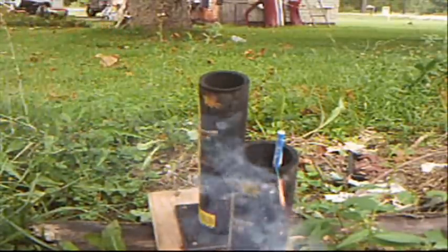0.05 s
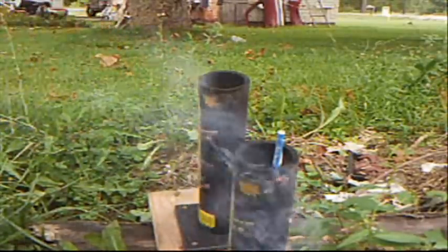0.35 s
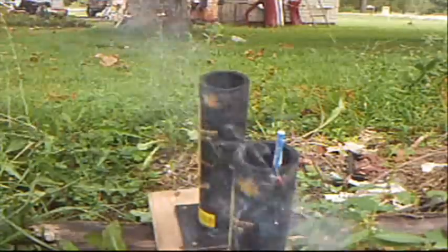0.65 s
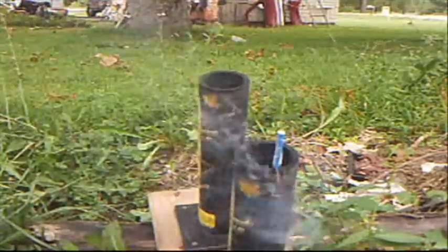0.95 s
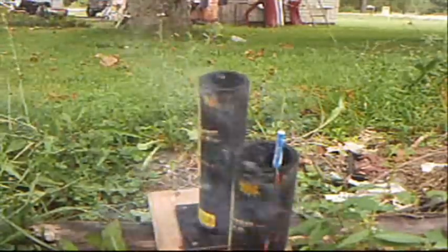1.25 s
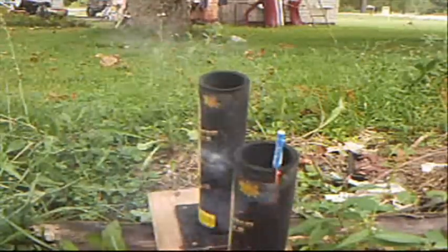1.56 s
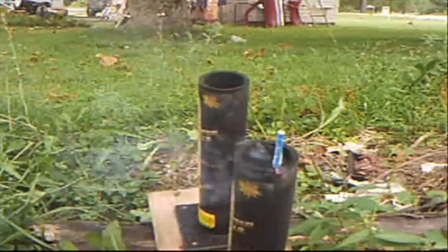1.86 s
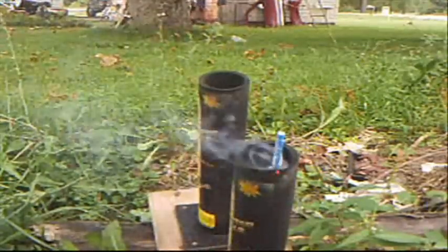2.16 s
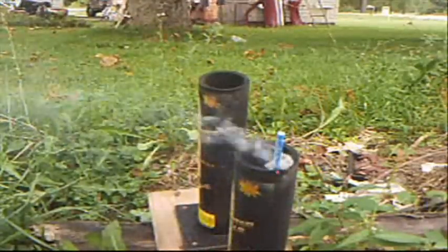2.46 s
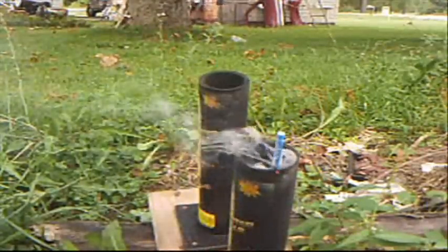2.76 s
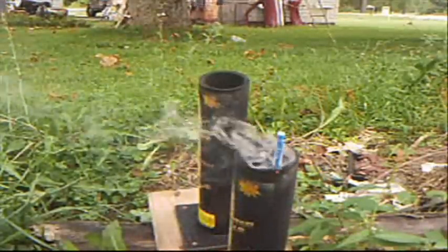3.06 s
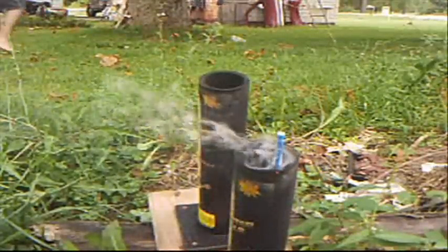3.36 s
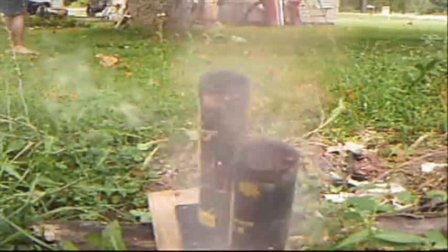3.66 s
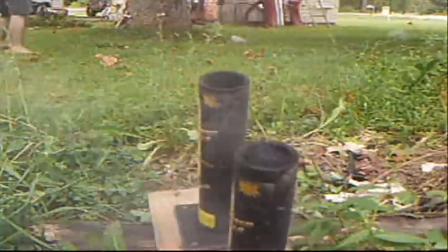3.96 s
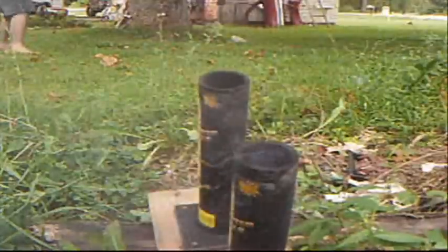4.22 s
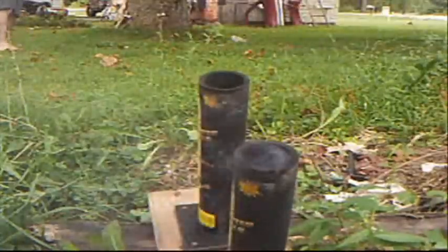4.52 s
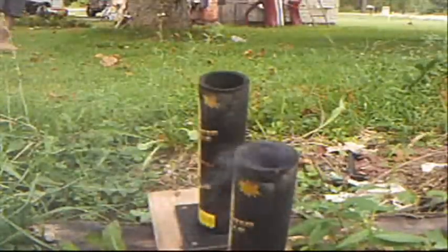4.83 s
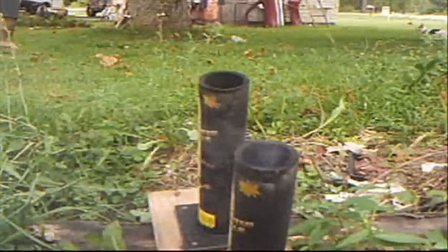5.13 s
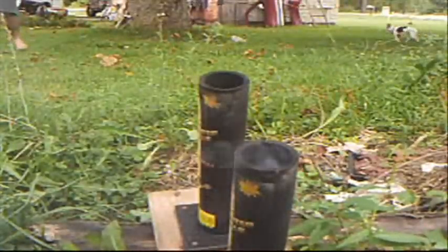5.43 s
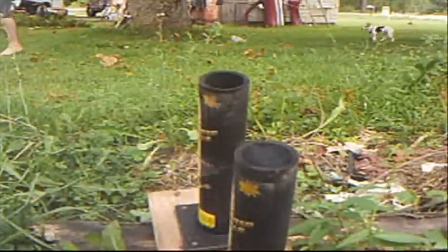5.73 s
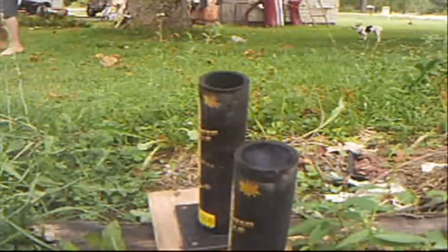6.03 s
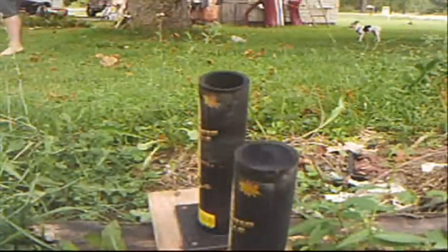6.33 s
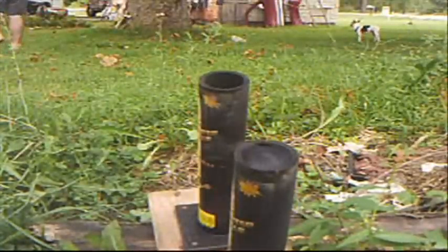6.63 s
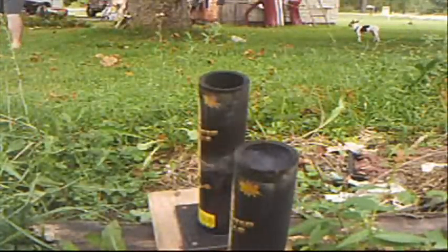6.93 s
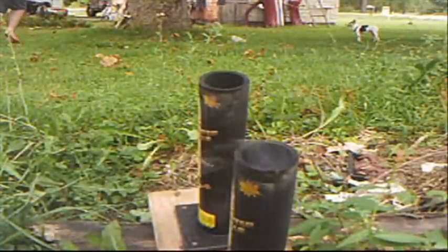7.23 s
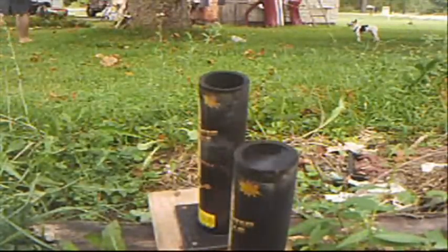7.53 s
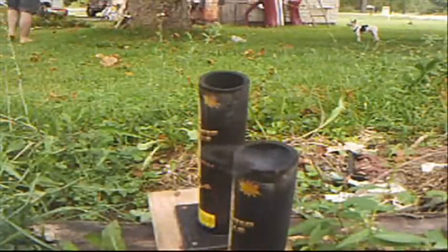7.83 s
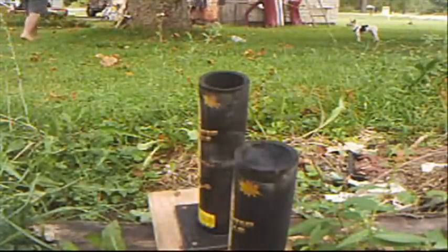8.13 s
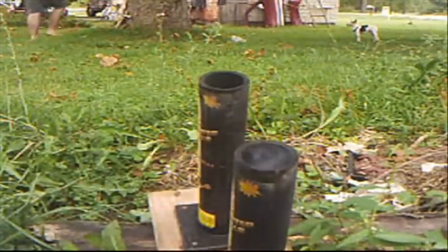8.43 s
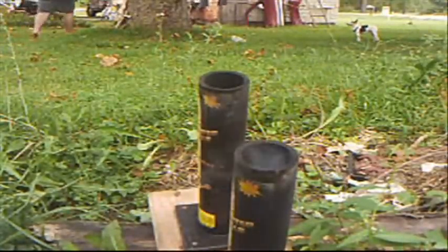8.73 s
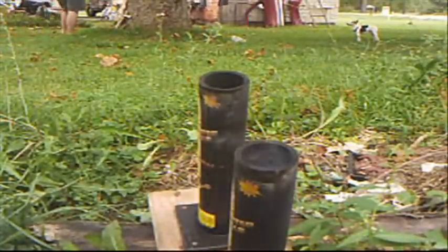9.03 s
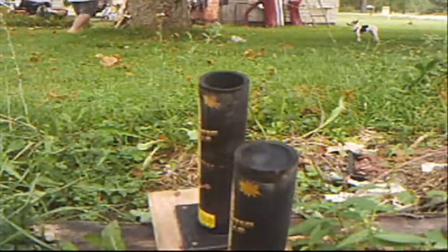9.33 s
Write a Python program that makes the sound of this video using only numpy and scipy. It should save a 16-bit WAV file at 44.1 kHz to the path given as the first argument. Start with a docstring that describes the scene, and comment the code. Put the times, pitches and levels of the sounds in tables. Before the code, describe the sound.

Crickets and insects chirp outdoors as a firework launches from a tube with a loud blast, then bursts with one sharp, echoing crack.

```python
"""A firework mortar fires from a lawn: the fuse fizzes and spits, the lift charge roars out as a jet
of gas, and the emptied tube hoots in its own draught. The shell bursts overhead with one sharp crack,
which the yard and a far line of trees throw back. Both bangs overload the microphone.
Around it two crickets chirp with their wings in front of farther ones, over a steady hiss of higher
insects, a low outdoor murmur and faint road-like drones."""
import sys
import numpy as np
from scipy import signal
from scipy.fft import rfft, irfft, next_fast_len
from scipy.io import wavfile

SR = 44100
rng = np.random.default_rng(int(sys.argv[2]) if len(sys.argv) > 2 else 0)


def wav_record(signal):
    """Record a signal, one row per channel, as 16-bit PCM in the file named by sys.argv[1]."""
    frames = np.transpose(np.atleast_2d(signal))
    bounded = np.clip(frames, -1, 1)
    # unit amplitude maps onto the largest positive 16-bit level
    quanta = np.round(bounded * 32767).astype(np.int16)
    wavfile.write(sys.argv[1], SR, quanta)


N = 413658
TIME = np.arange(N) / SR
FIRE_S, SHELL_OUT_S = 3.678, 3.727  # the lift charge lights, the shell leaves the muzzle


def from_db(db):
    """Decibels to gain."""
    return 10 ** (np.asarray(db) / 20)


def rms_one(x):
    """Scale to unit power."""
    return x / np.sqrt(np.mean(x ** 2) + 1e-20)


def noise(colour):
    """Unit-power noise shaped by an EQ curve."""
    hz, db = np.transpose(colour)
    bins = np.maximum(np.arange(N // 2 + 1) * SR / N, 1)
    eq = from_db(np.interp(np.log(bins), np.log(hz), db))
    return rms_one(irfft(rfft(rng.standard_normal(N)) * eq, N))


def flutter(rate_hz, depth_db):
    """A gain that wanders at random."""
    knots = rng.standard_normal(N // 10)
    return from_db(depth_db * np.interp(TIME * rate_hz, np.arange(len(knots)), knots))


def resonate(x, hz, width_hz):
    """One resonance, unity gain at its peak."""
    r = np.exp(-np.pi * width_hz / SR)
    poles = [1, -2 * r * np.cos(2 * np.pi * hz / SR), r * r]
    return signal.lfilter(np.array([1, 0, -1]) * (1 - r * r) / 2, poles, x + 1e-18)


def bandpass(x, hz, width_hz):
    """The same resonance twice, for steeper skirts."""
    return resonate(resonate(x, hz, width_hz), hz, width_hz)


def waver(hz, width_hz, evenness=0.25):
    """Turbulence sounding one resonance, its swings partly evened by saturation; unit power."""
    tone = signal.hilbert(resonate(rng.standard_normal(N), hz, width_hz), next_fast_len(N))[:N]
    return rms_one(tone.real / (np.abs(tone) + 1e-6) ** evenness)


def swell(full_s, hold_s, db, attack_db_per_s, release_db_per_s):
    """A gain envelope: attack, hold, release."""
    early, late = np.maximum(full_s - TIME, 0), np.maximum(TIME - full_s - hold_s, 0)
    return from_db(np.maximum(db - attack_db_per_s * early - release_db_per_s * late, -200))


def swells(rows):
    """The envelope of several swells whose powers add."""
    return np.sqrt(sum(swell(*row) ** 2 for row in rows))


def ring(start_s, hz, t60_s, db):
    """A struck resonance: one decaying sine."""
    age = np.maximum(TIME - start_s, 0)
    return from_db(db - 60 * age / t60_s) * np.sin(2 * np.pi * hz * age)


def scatter(x, colour, t60_s, wet_db):
    """Grass, trunks and walls scatter a sound into a short dense tail."""
    onset = 1 - np.exp(-TIME / 0.0028)
    tail = (noise(colour) * from_db(-60 * TIME / t60_s) * onset)[:SR]
    return from_db(wet_db) * signal.fftconvolve(x, tail / np.linalg.norm(tail))[:N]


# dark EQ of the ambience bed: freq_hz, gain_db
MURMUR_EQ = [(15, -3), (50, 0.5), (90, -2.5), (150, -11), (300, -6.5), (550, -5.5), (850, -1), (1150, -5.5),
             (1450, -11), (2000, -12), (3000, -19.5), (6000, -25), (11000, -30.5), (16000, -32)]
def murmur(db, ebb_db_per_s):
    """A distant outdoor murmur, slowly ebbing."""
    return from_db(db - ebb_db_per_s * TIME) * noise(MURMUR_EQ)


# far road-like hum: pitch_hz, width_hz, level_db
DRONE_TONES = [(412, 16, -63), (582.6, 12, -58.5), (783, 28, -62)]
def drones():
    """Faint tones that wander in level."""
    return sum(from_db(db) * waver(hz, width) * flutter(rate_hz=3.01, depth_db=1.6)
               for hz, width, db in DRONE_TONES)


# tones that poke out of the drones: full_s, hold_s, level_db, pitch_hz, sink_hz_per_s
PASSING_WHINES = [(1.55, .75, -53, 602, 14), (2.85, 0.11, -54, 421, 10), (8.98, 0.091, -52, 780, 20)]
def whines(fade_db_per_s):
    """Each whine fades in and out, sinking in pitch as it passes."""
    out = np.zeros(N)
    for full_s, hold_s, db, hz, sink_hz_per_s in PASSING_WHINES:
        wobble_hz = 10 * np.log(flutter(rate_hz=40, depth_db=5))
        pitch = hz - sink_hz_per_s * (TIME - full_s) + wobble_hz
        tone = rms_one(np.sin(2 * np.pi * np.cumsum(pitch) / SR) * flutter(rate_hz=25, depth_db=2.5))
        out += swell(full_s, hold_s, db, fade_db_per_s, fade_db_per_s) * tone
    return out


# high insect sizzle: centre_hz, width_hz, relative_db
INSECT_BANDS = [(7636, 1280, 2.5), (14330, 1270, -1.5)]
def insect_chorus(level_db):
    """Countless far insects merge into two bands of hiss."""
    hiss = sum(from_db(db) * bandpass(rng.standard_normal(N), hz, width)
               for hz, width, db in INSECT_BANDS)
    return from_db(level_db) * rms_one(hiss) * flutter(rate_hz=60, depth_db=1.35)


def far_crickets(level_db):
    """The farthest crickets blur into one wavering band."""
    band = rms_one(bandpass(rng.standard_normal(N), hz=4705, width_hz=390))
    return from_db(level_db) * band * flutter(rate_hz=25, depth_db=3.5)


# mid-heavy EQ of the yard's reverb: freq_hz, gain_db
YARD_EQ = [(50, -22), (220, -14), (420, -2.5), (600, 4), (1000, 6), (2000, 1), (3500, -4), (6000, -10.5),
           (8000, -6), (11000, -23), (14000, -10), (16000, -15)]
def yard_reverb(x, t60_s, wet_db):
    """The tail that the yard scatters back."""
    return scatter(x, YARD_EQ, t60_s, wet_db)


def cricket(runs, start_hz, end_hz, strokes):
    """Each wing stroke is a whistle that sinks as the scraper slows; a chirp of them swells and fades."""
    stroke_s, strokes_per_s, jitter_s = 0.027, 22, 0.0025
    edge_db, sag_hz = -3, 55  # a chirp is softer at both ends and droops in pitch
    out = np.zeros(N + SR)
    along = np.linspace(0, 1, int(stroke_s * SR))
    glide = start_hz + (end_hz - start_hz) * along ** 1.69  # holds, then drops ever faster
    envelope = np.sqrt(np.abs(np.sin(np.pi * along)))
    for first_s, end_s, period_s, db in runs:
        for middle_s in np.arange(first_s, end_s, period_s):
            for place in np.linspace(-1, 1, strokes):
                late, sharp, accent_db = rng.standard_normal(3)
                hz = glide * (1 + 0.0044 * sharp) - sag_hz * (place + 1) / 2
                stroke = envelope * np.sin(2 * np.pi * np.cumsum(hz) / SR)
                offset_s = place * (strokes - 1) / 2 / strokes_per_s + jitter_s * late
                at = max(int((middle_s + offset_s - stroke_s / 2) * SR), 0)
                out[at:at + len(along)] += from_db(db + edge_db * place ** 2 + accent_db) * stroke
    return out[:N]


# each singer's runs of even chirps: first_chirp_middle_s, end_s, period_s, premix_level_db
LOW_CHIRP_RUNS = [(.14, .7, 0.48, -50.5), (.93, 2.1, 0.49, -49.5), (2.55, 5.5, 0.38, -51),
                  (6.07, 7.1, .41, -51.5), (7.5, 9.4, .452, -51)]
HIGH_CHIRP_RUNS = [(.29, 3.7, .462, -51), (4.56, 5.2, .46, -49.5), (6.59, 7.3, .51, -49),
                   (7.5, 9.4, .447, -51.5)]
def near_crickets(direct_db):
    """Two raspy singers drift in and out of step."""
    rasp = flutter(rate_hz=270, depth_db=3.5)
    low = cricket(LOW_CHIRP_RUNS, start_hz=4780, end_hz=4206, strokes=5) * rasp
    high = cricket(HIGH_CHIRP_RUNS, start_hz=5080, end_hz=4730, strokes=4) * rasp
    send = from_db(-5.5) * low + high  # the high singer is farther off, so wetter
    return from_db(direct_db) * (low + high) + yard_reverb(send, t60_s=0.37, wet_db=-0.5)


# EQ of the fizz: freq_hz, gain_db
FIZZ_EQ = [(100, -1.5), (400, -10), (720, -7), (880, 4), (1200, -3.5), (1650, -9.5), (2030, -2),
           (2300, -22.5), (3200, -14.5), (8000, -28), (16000, -36)]
# snapping sparks: start_s, peak_db, pitch_hz
SPARKS = [(0.229, -33.5, 3400), (0.239, -37, 3400), (.2643, -33, 4200), (0.273, -33, 4000),
          (0.672, -37, 3000), (2.534, -33, 844), (3.045, -43, 6000)]
def fuse(fizz_db, enters_tube_s, fade_db_per_s, spark_decay_s, spark_q):
    """The fuse sputters and spits, its fizz growing fainter as it burns down inside the tube."""
    burning = from_db(fizz_db - fade_db_per_s * np.maximum(TIME - enters_tube_s, 0)) * (TIME < FIRE_S)
    out = burning * noise(FIZZ_EQ) * flutter(rate_hz=120, depth_db=2.5)
    age = TIME[:SR // 20]
    for start_s, db, hz in SPARKS:
        puff = rng.standard_normal(len(age)) * np.exp(-age / spark_decay_s)
        snap = bandpass(puff, hz, hz / spark_q)
        at = int(start_s * SR)
        out[at:at + len(age)] += from_db(db) * snap / np.abs(snap).max()
    return out


# near-odd harmonics of a pipe closed at one end: pitch_hz, width_hz, relative_db
TUBE_MODES = [(274.5, 8, -13), (798, 19.5, -4.5), (1324, 27, -14), (1896, 50, -9), (2437, 56, -19),
              (2990, 110, -20)]
# gusts through the empty tube: full_s, hold_s, level_db, attack_db_per_s, release_db_per_s
TUBE_GUSTS = [(3.7, .004, -25, 1397, 230), (3.78, .03, -42.5, 600, 60), (4.02, 0.22, -42, 109, 70),
              (4.3, 0.023, -37.5, 300, 398), (4.4, 0.17, -44.5, 150, 85)]
def tube_hoot():
    """The departing shell kicks the hot air column; gas surging in the empty tube then blows its modes."""
    kick = ring(start_s=3.72, hz=279, t60_s=0.29, db=-24.5)
    draught = swells(TUBE_GUSTS) * flutter(rate_hz=45, depth_db=2)
    hoot = rms_one(sum(from_db(db) * waver(hz, width) for hz, width, db in TUBE_MODES))
    return kick + draught * hoot


# full-bodied EQ of the gas jet: freq_hz, gain_db
JET_EQ = [(20, -6), (55, 3.5), (110, 0.5), (170, -5.5), (260, 1.5), (360, -5), (520, 1), (680, -2.5),
          (850, 1), (1300, -4.5), (2000, -4.5), (3000, -6), (5000, -8.5), (8000, -9.5), (16000, -17)]
# bright EQ of the tail off the leaves: freq_hz, gain_db
FOLIAGE_EQ = [(100, -35), (700, -8.5), (2000, -6), (4000, -3.5), (8000, -1.5), (11000, -6), (14000, 3),
              (16000, -3.5)]
def lift_charge(overshoot_db, build_s, settle_s):
    """A ragged jet of gas overshoots, holds until the shell is out, then collapses; foliage scatters it."""
    pressure = swell(FIRE_S, SHELL_OUT_S - FIRE_S, db=-8, attack_db_per_s=1343, release_db_per_s=830)
    early, age = np.maximum(FIRE_S - TIME, 0), np.maximum(TIME - FIRE_S, 0)
    overshoot = from_db(overshoot_db * np.exp(-(age / settle_s) ** 2 - early / build_s))
    jet = pressure * overshoot * noise(JET_EQ) * flutter(rate_hz=600, depth_db=2.2)
    return jet + scatter(jet, FOLIAGE_EQ, t60_s=0.32, wet_db=-12.5)


# rolling echoes: full_s, hold_s, level_db, attack_db_per_s, release_db_per_s
TREE_RETURNS = [(5.42, .02, -41, 1050, 33), (5.725, 0.13, -40.5, 260, 130), (5.94, .08, -43, 110, 55),
                (6.1, .1, -54.5, 63, 10)]
# thin, dull EQ of those echoes: freq_hz, gain_db
TREE_EQ = [(100, -44), (500, -19), (1000, -4), (1400, -3), (2200, -4.5), (3200, -13), (5000, -17),
           (7000, -28), (12000, -63)]
def tree_echoes():
    """Trees at several distances return the burst as swells of noise."""
    return swells(TREE_RETURNS) * noise(TREE_EQ) * flutter(rate_hz=100, depth_db=2)


# slapbacks off nearby walls and trunks: start_s, send_db
SLAPBACKS = [(5.3837, 9.5), (5.418, -1.5), (5.4254, -1), (5.487, -9.5)]
# EQ of the slapbacks: freq_hz, gain_db
SLAP_EQ = [(100, -24), (280, -13), (550, 4), (1100, -1), (2200, 2), (4000, -16), (8000, -16), (16000, -36)]
def yard_echoes(hit_s):
    """The ground shock sets nearby things ringing; the yard answers with slaps and a short tail."""
    ringing = ring(hit_s, hz=994, t60_s=0.033, db=-4.5)
    hit, taps = np.zeros((2, N))
    hit[int(hit_s * SR)] = 1
    for start_s, db in SLAPBACKS:
        taps[int(start_s * SR)] = from_db(db)
    slaps = scatter(taps, SLAP_EQ, t60_s=0.028, wet_db=2)
    return ringing + slaps + yard_reverb(hit, t60_s=0.41, wet_db=11.5)


# the crack, direct then off the ground: start_s, n_wave_peak_db, length_s, tear_relative_db
SHOCK_WAVES = [(5.3803, 7.5, 0.001207, 1), (5.3836, 12, 0.0004, -0.5)]
# EQ of its tearing edge: freq_hz, gain_db
TEAR_EQ = [(50, 0), (400, 1.5), (1000, 4.5), (2300, 7), (3500, -9), (5000, -1.5), (8000, -3), (11000, -17),
           (14000, -4.5), (16000, -9)]
def shell_burst(tear_s, push_s, push_relative_db):
    """Two N-shaped shocks, each with a tearing edge and a low push, then their echoes."""
    crack, tearing = np.zeros(N), noise(TEAR_EQ)
    for start_s, db, length_s, tear_db in SHOCK_WAVES:
        age = np.maximum(TIME - start_s, 0)
        n_wave = (1 - 2 * age / length_s) * (age < length_s)
        edge = from_db(tear_db) * tearing * np.exp(-(age / tear_s) ** 2)
        push = from_db(push_relative_db) * (1 - age / push_s) * np.exp(-age / push_s)
        crack += from_db(db) * (age > 0) * (n_wave + edge + push)
    return crack + yard_echoes(hit_s=SHOCK_WAVES[-1][0]) + tree_echoes()


def scene():
    """The mono mix at one microphone near the tube."""
    bed = murmur(db=-46.5, ebb_db_per_s=0.1853) + drones() + whines(fade_db_per_s=55)
    insects = insect_chorus(level_db=-54.5) + far_crickets(level_db=-62.5) + near_crickets(direct_db=-2.5)
    fizz = fuse(fizz_db=-48.5, enters_tube_s=1.35, fade_db_per_s=5.5, spark_decay_s=0.0035, spark_q=0.98)
    launch = tube_hoot() + lift_charge(overshoot_db=11, build_s=0.0038, settle_s=0.013)
    burst = shell_burst(tear_s=0.00099, push_s=0.0026, push_relative_db=-19)
    return (bed + insects + fizz + launch + burst)[None]


def record(dry):
    """The converter sits off centre and clips on the bangs; a steep low-pass cuts the top."""
    dc_offset, cutoff_hz = -0.0875, 15900
    clipped = np.clip(dry + dc_offset, -1, 1) - dc_offset
    lowpass = signal.ellip(10, 0.1, 70, cutoff_hz, fs=SR, output="sos")
    return np.clip(signal.sosfilt(lowpass, clipped) + dc_offset, -1, 1)


dry = scene()
out = record(dry)
wav_record(out)
```